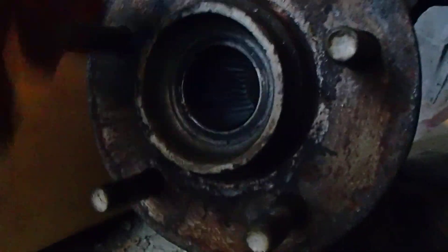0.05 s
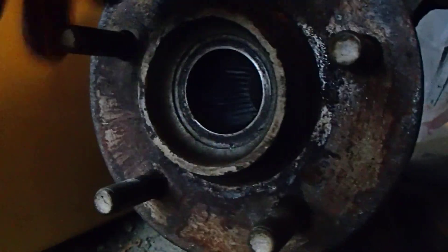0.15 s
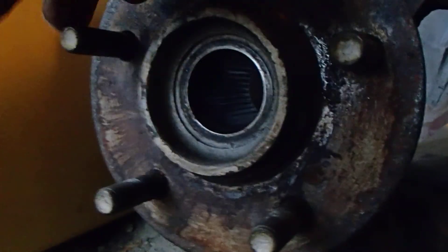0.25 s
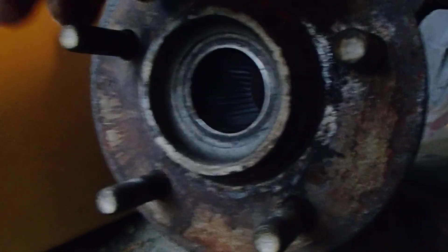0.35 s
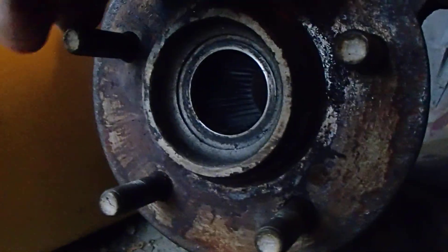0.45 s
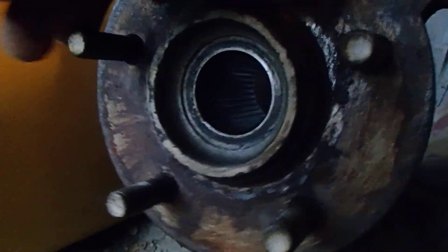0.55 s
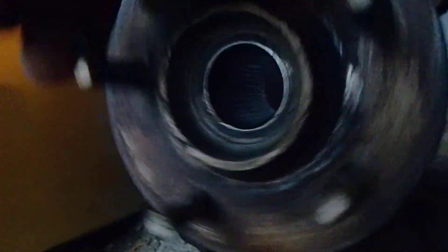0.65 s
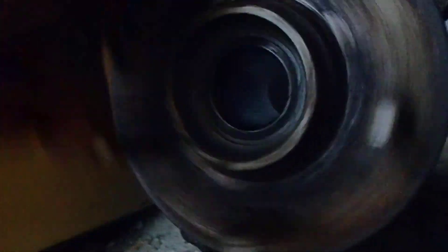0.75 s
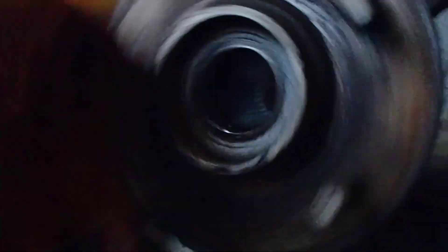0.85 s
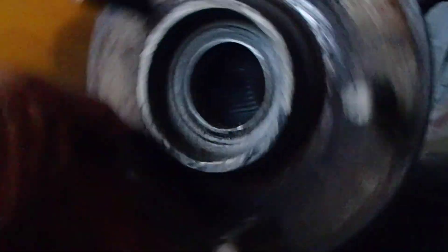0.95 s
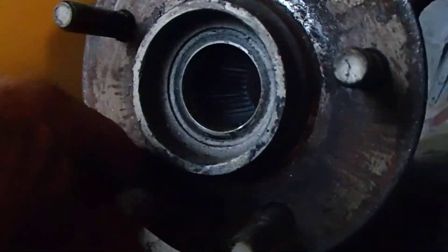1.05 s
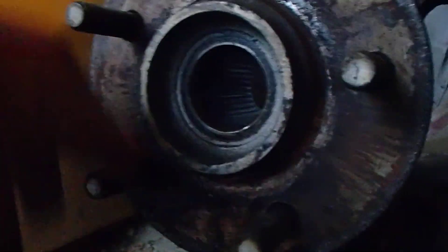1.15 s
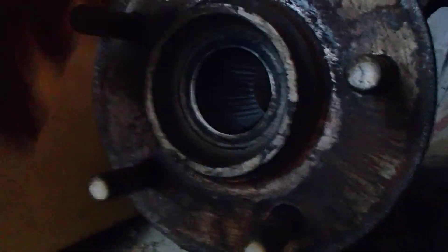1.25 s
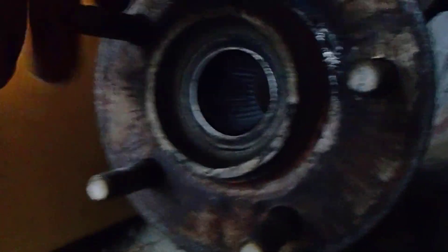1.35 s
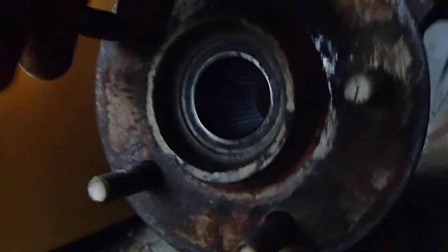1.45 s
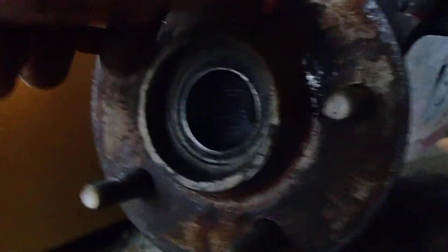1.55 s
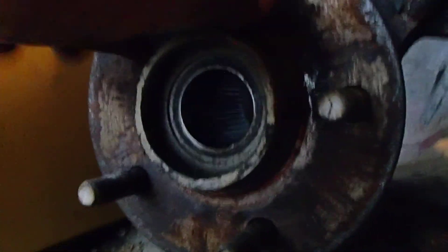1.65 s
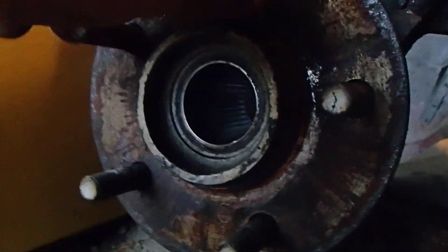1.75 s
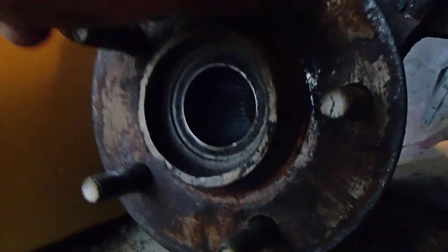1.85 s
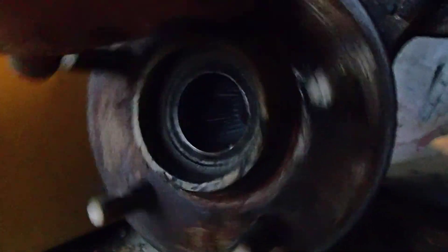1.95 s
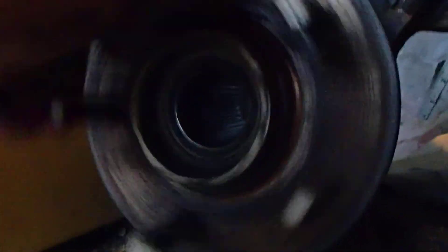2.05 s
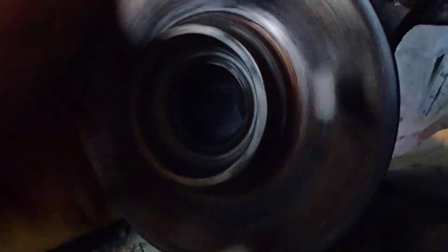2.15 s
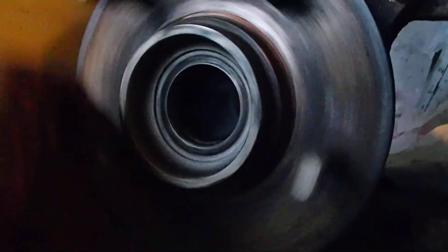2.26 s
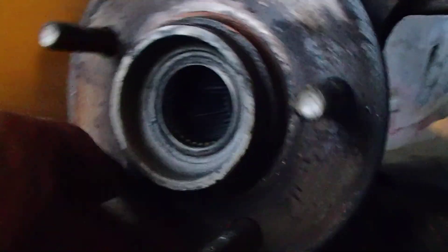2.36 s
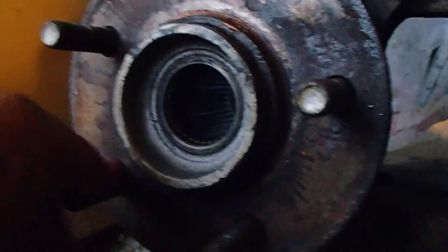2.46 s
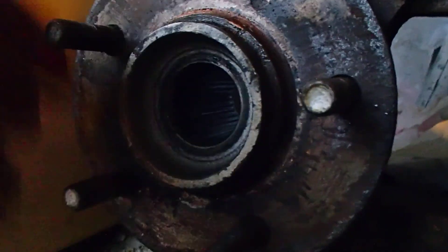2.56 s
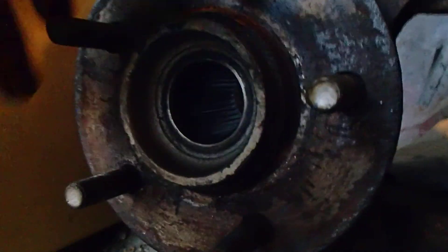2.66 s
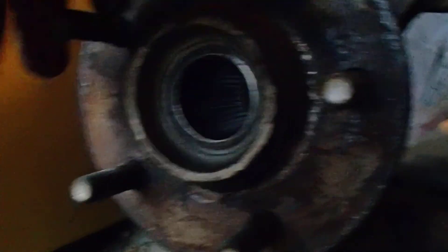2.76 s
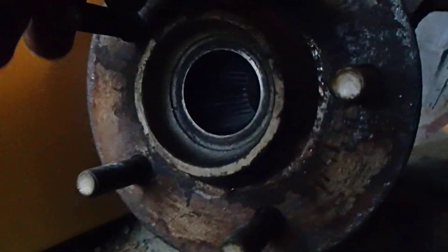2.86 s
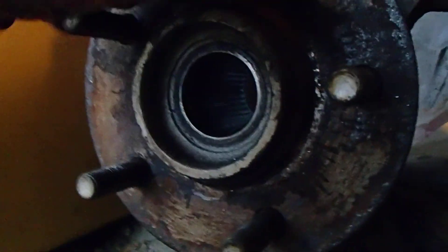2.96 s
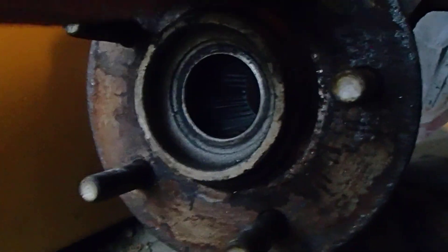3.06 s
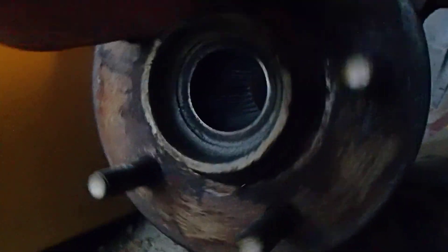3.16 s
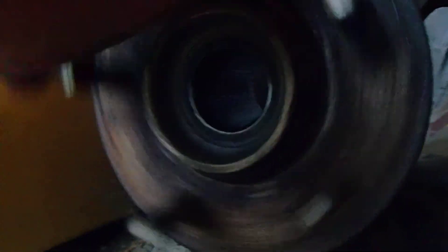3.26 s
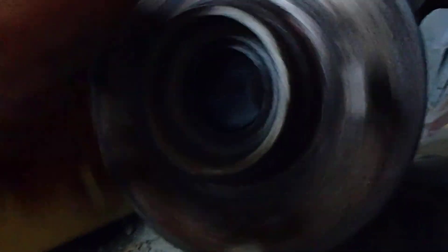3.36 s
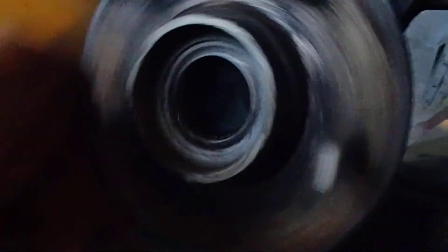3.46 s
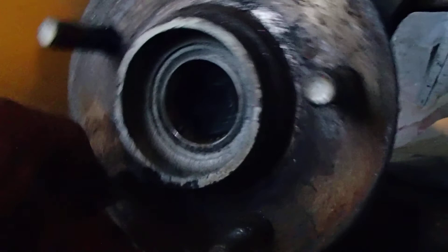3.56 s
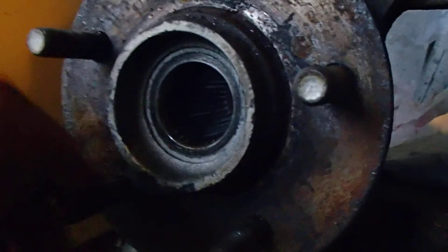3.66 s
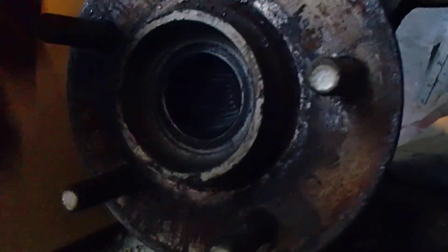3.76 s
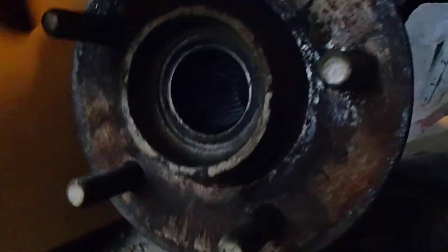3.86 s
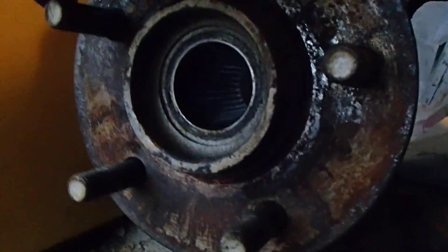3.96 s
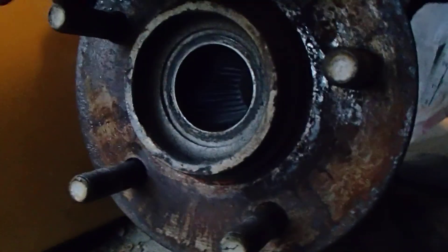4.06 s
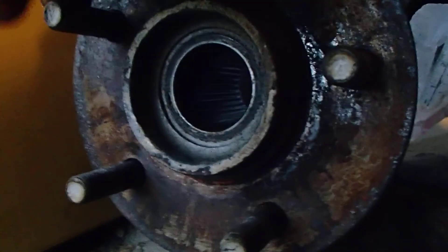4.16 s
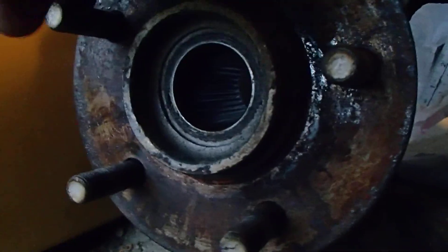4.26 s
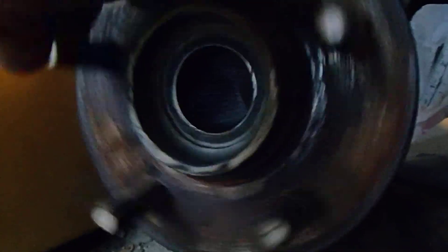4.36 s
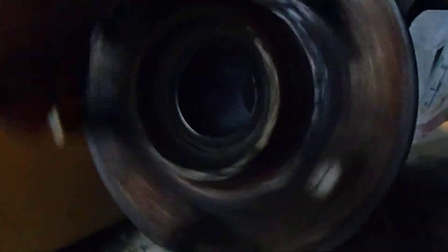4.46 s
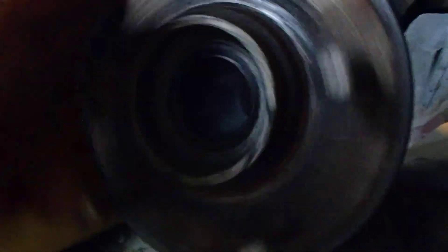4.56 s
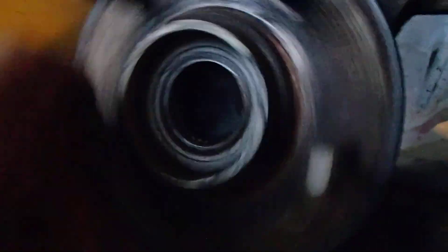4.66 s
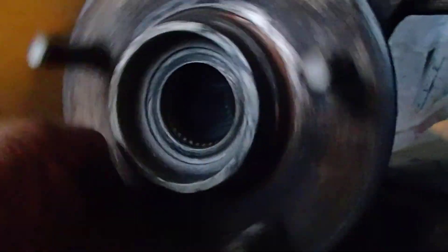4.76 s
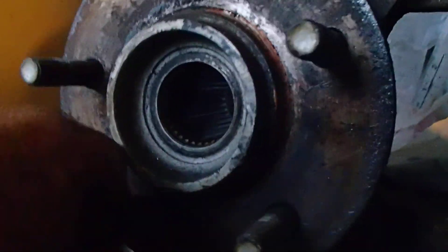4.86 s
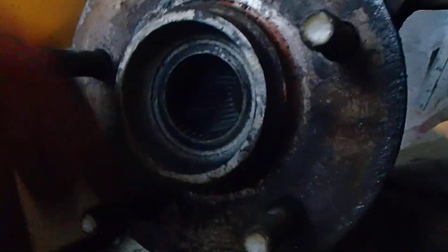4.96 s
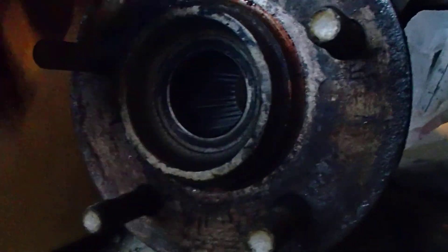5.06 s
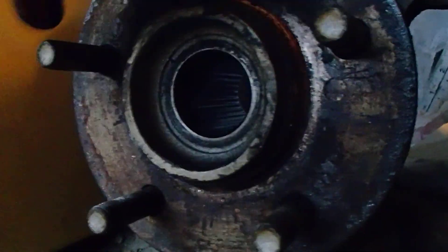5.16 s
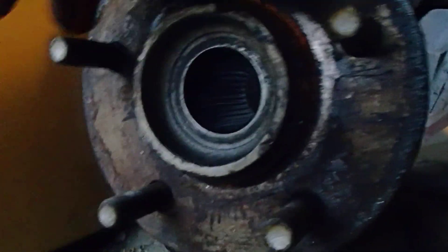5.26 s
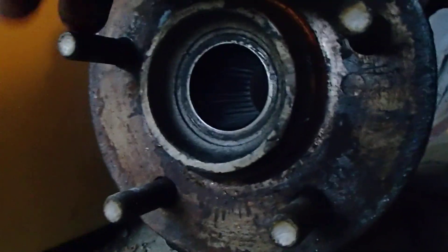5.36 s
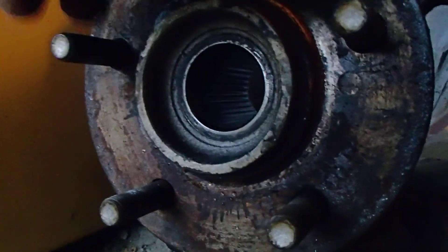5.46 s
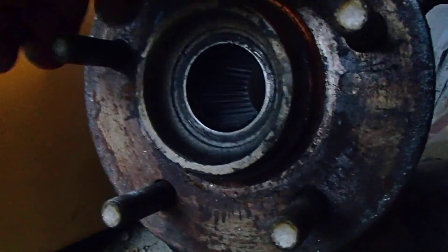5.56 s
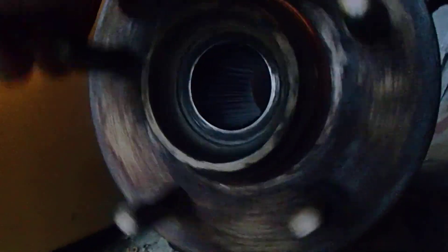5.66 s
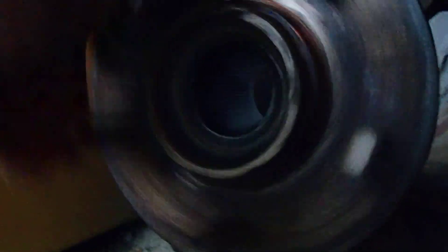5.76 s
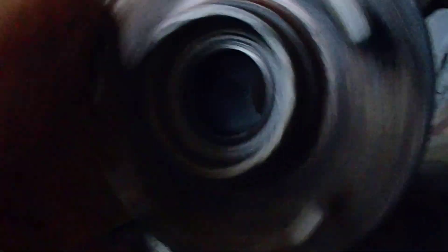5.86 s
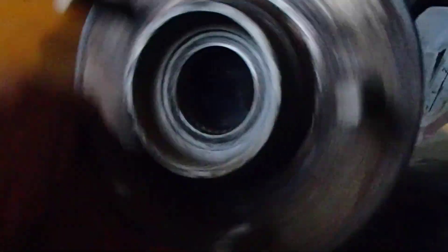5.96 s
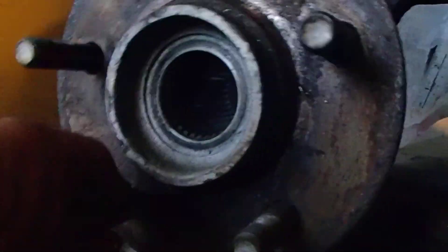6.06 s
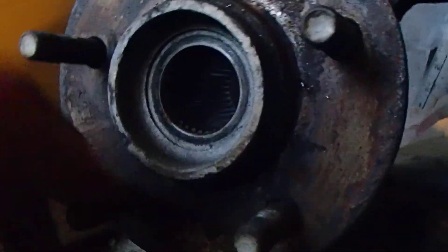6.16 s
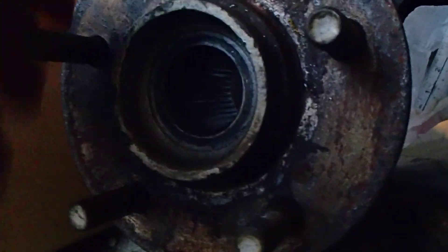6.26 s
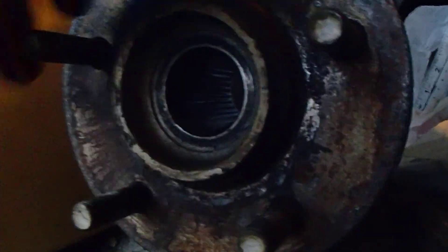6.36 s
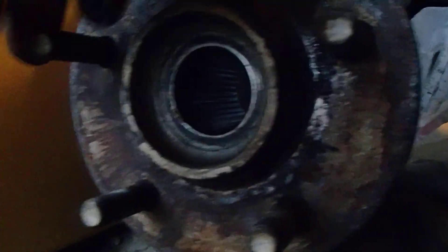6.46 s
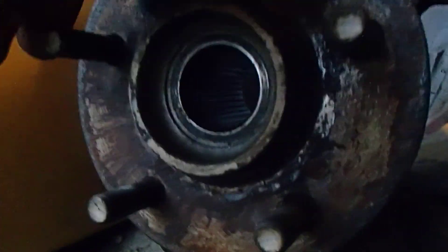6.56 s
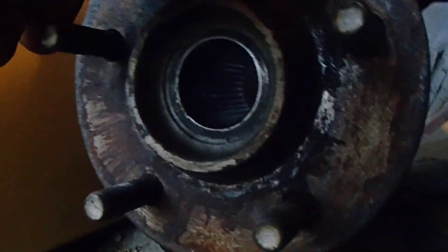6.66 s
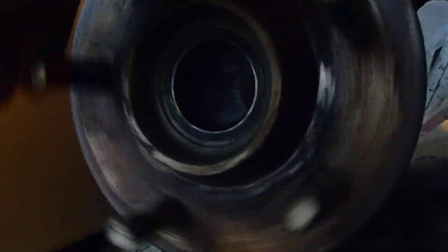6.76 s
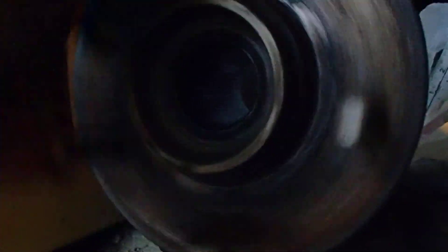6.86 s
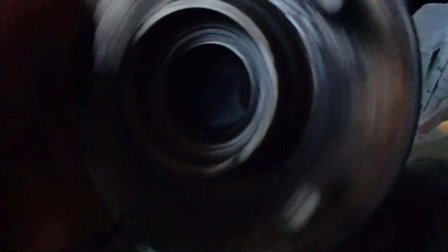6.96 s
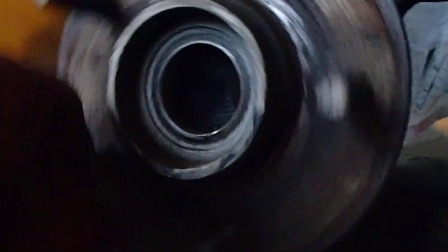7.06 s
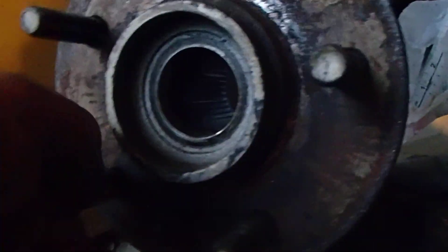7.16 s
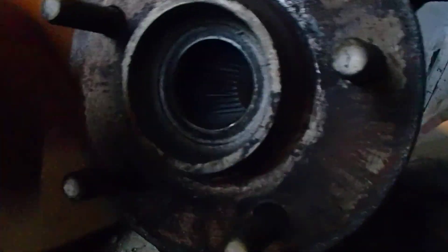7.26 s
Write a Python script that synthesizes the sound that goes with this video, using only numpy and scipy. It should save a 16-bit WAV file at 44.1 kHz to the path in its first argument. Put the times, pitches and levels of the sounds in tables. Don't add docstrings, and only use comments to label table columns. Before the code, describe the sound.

In a quiet indoor workshop, steady hiss and a dull finger tap precede a bright, crackling snap from a dry bearing. A second crunch follows about a fifth of a second later as the turn ends. The pattern repeats unevenly six times, with light finger touches, small ticks and short high rings in the pauses. Close, single-channel sound with a very short room tail.

```python
import sys
import numpy as np
from scipy import signal
from scipy.fft import rfft, irfft, next_fast_len
from scipy.io import wavfile
from scipy.ndimage import uniform_filter1d

SR = 44100
rng = np.random.default_rng(int(sys.argv[2]) if len(sys.argv) > 2 else 0)


def volts(x):
    e = np.asarray(x, float) / 20
    return 10 ** e


def master(y):
    cut = np.clip(np.atleast_2d(y).T, -1, 1)
    pcm = np.round(cut * 32767)
    wavfile.write(sys.argv[1], SR, pcm.astype(np.int16))


N = 322371

# [f/Hz, density/dB per Hz]
ROOM_COLOUR = [(20, -7), (50, -10.5), (200, -8.5), (330, -3.5), (470, -8), (570, -1.5), (950, 1.5),
               (1650, -2), (2100, -2.5), (4200, -5), (4550, -10.5), (7000, -19), (14500, -30), (16000, -33)]
# [f/Hz, width/Hz, level/dB]
MURMURS = [(4136, 17, -62.5), (6700, 30, -82)]
ROOM_DB = -45.5

FLANGE_HZ = [3316, 4160, 5540, 6600, 8205, 10145, 4740, 5470]
# [time to fall 60 dB/s, split/Hz, share of the twin]
FLANGE_PAIRS = [(0.19, 2.1, 0.19), (0.34, 11.7, 0.28), (0.3, 15, 0.16), (0.17, 60.0, 0.31),
                (0.25, 10.3, 0.19), (0.15, 16, .2), (0.12, 21.0, .3), (0.16, 88, 0.34)]
# [t/s, f/Hz, level/dB, free time/s]
GRAZES = [(0.089, 4160, -45, .05), (.09, 6600, -55, .05), (.13, 3316, -44, .05), (.13, 4160, -47, .05),
          (.29, 5540, -54, .05), (.718, 5540, -40, .03), (.81, 5540, -53, .04), (1.065, 5540, -51, .05),
          (1.58, 3316, -45, .04), (2.98, 6600, -56, .035), (3.74, 3316, -38, 0.067),
          (4.7, 4160, -46, 0.065), (4.835, 3316, -40, 0.057), (4.87, 3316, -41, .04),
          (5.03, 4160, -49, .07), (5.19, 5540, -51.5, .09), (5.91, 4160, -45, .07), (6.1, 3316, -44.5, .07),
          (6.115, 4160, -47, .07), (6.17, 4160, -47, 0.073)]
# [t/s, level of modes 1, 2, 3, 4/dB]
TOUCHES = [(.396, -42.5, -51, -53, -46), (.8, -72, -47, -74, -43), (.826, -35.5, -71, -47, -56),
           (1.15, -48, -36, -44.5, -43), (1.265, -72, -55, -72, -49), (1.51, -43.5, -40.5, -53, -51),
           (1.535, -38.5, -42, -48, -42.5), (3.675, -30.5, -23.5, -48, -46), (4.895, -41, -33.5, -51, -44),
           (4.925, -40, -59, -42, -56), (4.97, -50, -61, -62, -72), (5.465, -72, -46, -72, -48),
           (6.064, -60, -42, -49, -55), (7.135, -45, -72, -46.5, -58)]
# [t/s, level of modes 1, 4, 5/dB, free time before the bearing grips/s]
RINGS = [(.714, -18.5, -47, -59, 0.067), (.912, -43, -52, -64, 0.032), (2.077, -24.5, -51, -47, .09),
         (2.272, -52, -60, -68, 0.033), (3.287, -35, -49, -53, 0.071), (3.46, -23, -44, -61, 0.017),
         (4.464, -19, -40, -53, 0.084), (4.657, -29, -57, -57, 0.023), (5.737, -27.5, -51, -54, 0.037),
         (5.902, -32, -52, -49, .045), (6.827, -35, -32, -43, 0.053), (7.004, -26, -38, -50, 0.027)]
GRIP_T60_S = 0.07
CRUNCH_RISE_S, TOUCH_RISE_S = 0.0015, 0.0066
OVERTONE_DB, SIDE_TONE_DB = -0.5, -16
RIM_BASE_DB, RIM_FOLLOWS = -32, 0.36
TOUCH_FREE_S, TOUCH_FREE_S_PER_DB, TOUCH_FIRM_DB = 0.048, 0.3, -41
ASLEEP_DB = -75

# [t/s, peak level/dB, length/s]
TAPS = [
    (0.253, -36, 0.0057),
    (1.682, -26, 0.01),
]
# [f/Hz, width/Hz, level/dB]
TAP_COLOUR = [(810, 490, 4.5), (1950, 260, 5), (2940, 1100, 3), (4770, 2800, -2.5)]
# [t/s, peak level/dB, length/s]
BRUSHES = [(.39, -69, .03), (0.712, -51, .008), (.83, -61, 0.028), (1.54, -66, .02), (2.06, -77, .03),
           (2.24, -59, 0.019), (2.38, -69, .02), (3.283, -59, .006), (3.42, -58, 0.014),
           (3.564, -63, 0.018), (4.636, -44, .008), (4.829, -65, 0.019), (4.908, -58, .01),
           (5.47, -68, .02), (5.74, -73, 0.018), (5.893, -51, .008), (6.07, -64, 0.016),
           (6.819, -54, 0.0059), (6.979, -63, 0.027), (7.069, -64, 0.032), (7.14, -67, 0.026)]
BRUSH_REST_DB = -64.5
# [t/s, peak level/dB]
TICKS = [
    (1.922, -47),
    (3.5472, -47),
    (3.675, -42),
    (4.806, -43),
    (5.4627, -39.5),
]
# [t/s, peak level/dB]
KNOCKS = [(.75, -44), (2.25, -43.5), (5.72, -40.5), (5.873, -35), (6.85, -41), (3.325, -35), (3.364, -39),
          (4.551, -40), (5.844, -43)]

# [t/s, length/s, rumble level at full speed/dB]
TURNS = [
    (0.613, 0.42, -42.5),
    (2.001, 0.33, -50),
    (3.197, 0.28, -42.5),
    (4.4, 0.31, -41.5),
    (5.64, 0.37, -42.5),
    (6.778, .25, -44),
]
RUMBLE_REST_DB = -52

# [t/s, length/s, race level/dB, chatter f/Hz, cage level against race/dB]
CRUNCHES = [(0.699, .015, -13, 3640, -9), (.861, .001, -40, 3440, 2), (0.8827, .028, -24.5, 3590, -6.5),
            (2.0607, .018, -19.5, 3560, 1), (2.2217, 0.0075, -36, 3420, -7),
            (2.2403, .031, -23.5, 3620, -2), (3.2722, .006, -24, 3520, 0), (3.2835, 0.0016, -9, 3530, -23),
            (3.414, 0.007, -32.5, 3700, -10), (3.4294, .028, -20, 3480, -4.5),
            (3.6744, .001, -29, 4170, -25), (4.454, 0.012, -14, 3550, -3), (4.592, .0005, -45, 3720, 11),
            (4.621, 0.0056, -27, 3400, -13), (4.6321, 0.023, -12, 3640, -7),
            (5.727, 0.0083, -13.5, 3520, -7), (5.871, 0.0032, -34, 3375, -3),
            (5.8822, 0.023, -20.5, 3580, -5.5), (6.8068, 0.0123, -16, 3500, -2),
            (6.8236, .004, -10.5, 3520, -8), (6.933, 0.0038, -48, 3496, -1), (6.9725, .003, -34, 3500, -16),
            (6.9846, .016, -19.5, 3330, -6)]
# [t/s, race level/dB, chatter f/Hz, cage level/dB]
CATCHES = [(.6954, -15, 3410, -9.5), (.7053, -10, 3190, -12), (.713, -9, 3430, -10.5),
           (.8908, -27, 3610, -31), (.907, -22, 3520, -25), (2.063, -4, 3590, -5), (2.0717, -14, 3456, -24),
           (2.0767, -14, 3600, -26), (2.2572, -16.5, 3696, -32), (3.274, -13, 3490, -14),
           (3.2767, -11, 3600, -11), (3.2825, -8, 3606, -10), (3.4299, -13.5, 3820, -20),
           (3.4377, -17, 3590, -29), (3.4533, -10.5, 3520, -28), (3.4608, -15.5, 3500, -23),
           (4.4582, -27, 3600, -25), (4.4649, -18, 3580, -14.5), (4.6359, -14, 3610, -8),
           (4.6444, -16, 3530, -27), (4.653, -14, 3520, -20), (5.727, -17, 3355, -11.5),
           (5.7322, -6, 3560, -10), (5.7363, -14, 3510, -13), (5.8903, -10, 3583, -10.5),
           (5.8992, -10, 3497, -9.5), (6.811, -23, 3600, -11.5), (6.8168, -13, 3250, -17),
           (6.8218, -5.5, 3348, -8), (7.0053, -13.5, 3310, -15.5)]
# [f/Hz, width/Hz, level/dB]
RACE = [(2057, 117, -15.5), (2408, 114, -9.5), (3056, 296, -2.5), (3890, 230, 4.5), (3918, 275, 1)]
# [f/Hz, width/Hz, level/dB]
CAGE = [(5115, 200, -6), (5440, 260, 2), (6010, 220, -7), (6197, 183, 8.5), (6616, 280, -3.5),
        (7050, 114, -2), (7860, 250, -10.5)]
# [f/Hz, width/Hz, level/dB]
GRIT = [(9120, 210, 7), (10300, 230, 6), (12200, 300, -2), (12400, 900, -20), (14500, 1700, -13)]
# [f/Hz, width/Hz, level/dB]
SQUEAL = [(3500, 330, 0)]
SLIP_GAP_S, SLIP_UNEVEN = 0.003, 0.3
SLIP_SPREAD_DB, SLIP_SPREAD_HZ = 2, 110
CRUNCH_RELEASE_DB_PER_S = 2500
CAGE_FADE_DB_PER_S = 252
CAGE_SPREAD_DB = 2.5
GRIT_BASE_DB, GRIT_FOLLOWS, GRIT_SPREAD_DB = -27.5, 0.8, 3

WALLS_DB, WALLS_T60_S = -21.5, 0.14
MICROPHONE_TOP = 1.4


def resonate(x, peaks):
    out = 0
    for k, (hz, width_hz, db) in enumerate(peaks):
        r = np.exp(-np.pi * width_hz / SR)
        b = (1 - r * r) / 2 * np.array([1, 0, -1])
        a = [1, -2 * r * np.cos(2 * np.pi * hz / SR), r * r]
        out = out + (-1) ** k * volts(db) * signal.lfilter(b, a, x + 1e-18)
    return out * np.std(x) / np.std(out)


def grains(per_s, spread_db):
    sizes = volts(spread_db * np.minimum(rng.exponential(1, N), 3.0)) * rng.choice([-1, 1], N)
    hits = sizes * (rng.random(N) < per_s / SR)
    return hits / np.std(hits)


def swells(times, levels_db, rise_s, fall_s):
    power = np.zeros(N)
    np.add.at(power, (np.array(times) * SR).astype(int), volts(2 * np.array(levels_db)))
    t = np.arange(-2000, 2001) / SR
    shape = np.where(t < 0, np.exp(-(t / rise_s) ** 2), np.exp(-np.abs(t) / fall_s))
    return np.sqrt(np.abs(signal.fftconvolve(power, shape, "same")))


def room():
    size = next_fast_len(N)
    hz, db = np.transpose(ROOM_COLOUR)
    bins_hz = np.fft.rfftfreq(size, 1 / SR)
    colour = volts(np.interp(np.log(bins_hz + 1), np.log(hz), db))
    hiss = irfft(rfft(rng.standard_normal(size)) * colour, size)[:N]
    murmur = sum(volts(db) * resonate(rng.standard_normal(N), [(hz, width_hz, 0)])
                 for hz, width_hz, db in MURMURS)
    return volts(ROOM_DB) * hiss / np.std(hiss) + murmur


def hand_rows():
    touches = []
    for s, *db in TOUCHES:
        firmness_db = max(max(db) - TOUCH_FIRM_DB, 0)
        touches.append((s, *db, TOUCH_FREE_S + TOUCH_FREE_S_PER_DB * firmness_db))
    struck_hz = np.array(FLANGE_HZ[:4])
    grazes = []
    for s, hz, db, free_s in GRAZES:
        distance = np.abs(struck_hz - hz)
        levels_db = np.where(distance == distance.min(), db, ASLEEP_DB)
        grazes.append((s, *levels_db, free_s))
    return touches + grazes


def flange(rows, struck, follower, rise_s):
    out = np.zeros(N + SR)
    t = np.arange(SR // 3) / SR
    leader, follower_mode, under_db = follower
    modes = np.column_stack([FLANGE_HZ, FLANGE_PAIRS])[struck + [follower_mode]]
    hz, t60, split_hz, share = modes.T[:, :, None]
    phases = 2 * np.pi * rng.random((len(rows), len(hz), 1))
    for (s, *levels_db, free_s), phase in zip(rows, phases):
        levels_db = np.append(levels_db, levels_db[leader] + under_db)[:, None]
        main = np.sin(2 * np.pi * hz * t + phase)
        twin = np.sin(2 * np.pi * (hz + split_hz) * t + phase)
        pair = (main + share * twin) / (1 + share)
        loss_db = 60 * t / t60 + 60 * np.maximum(t - free_s, 0) / GRIP_T60_S
        tones = volts(levels_db - loss_db) * pair
        out[int(s * SR):][:len(t)] += np.clip(t / rise_s, 0, 1) * tones.sum(axis=0)
    return out[:N]


def fingers():
    taps = resonate(grains(per_s=2300, spread_db=-14.0), TAP_COLOUR)
    taps = signal.sosfilt(signal.butter(2, 6000, fs=SR, output="sos"), taps)
    tap_force = sum(swells([s], [db - 9.0], 0.0048, length) for s, db, length in TAPS)
    brush = resonate(grains(per_s=7300, spread_db=2.0), [(11900, 6000, 2.0), (15100, 910, 3)])
    strokes = sum(swells([s], [db], length, length) for s, db, length in BRUSHES)
    skin = (volts(BRUSH_REST_DB) + strokes) * brush
    nail = resonate(rng.standard_normal(N), [(4500, 3000, 9), (12000, 7000, -12)])
    ticks = nail * swells(*np.transpose(TICKS), 0.0004, 0.0006)
    housing = resonate(grains(per_s=1600, spread_db=2.5), [(795, 240, -0.26), (1170, 270, -1.7)])
    knocks = housing * swells(*np.transpose(KNOCKS), 0.0031, 0.0058)
    return taps * tap_force + volts(-0.5) * (ticks + knocks) + volts(-1.5) * skin


def rumble():
    housing = [(134, 64, 2.0), (844, 170, 2), (1290, 210, 4.0), (2110, 225, 6.5)]
    t = np.arange(N) / SR
    speed = sum(volts(db) * np.sin(np.pi * np.clip((t - s) / length, 0, 1)) ** 2
                for s, length, db in TURNS)
    grinding = resonate(grains(per_s=1200, spread_db=3.0), housing)
    return volts(-4.5) * np.hypot(volts(RUMBLE_REST_DB), speed) * grinding


def slips():
    start, length, race_db, pitch_hz, cage_db = np.transpose(CRUNCHES)[:, :, None]
    luck = rng.standard_normal((len(CRUNCHES), 14, 4))
    gaps = SLIP_GAP_S * np.exp(SLIP_UNEVEN * luck[..., 0])
    since = np.cumsum(gaps, axis=1) - gaps[:, :1]
    late_db = CRUNCH_RELEASE_DB_PER_S * np.maximum(since - length, 0)
    race_db = race_db - late_db + SLIP_SPREAD_DB * luck[..., 1]
    pitch_hz = pitch_hz + SLIP_SPREAD_HZ * luck[..., 2]
    cage_db = race_db + cage_db - CAGE_FADE_DB_PER_S * since + CAGE_SPREAD_DB * luck[..., 3]
    runs = np.stack([start + since, race_db, pitch_hz, cage_db], axis=2).reshape(-1, 4)
    rows = np.vstack([CATCHES, runs])
    grit_luck_db = GRIT_SPREAD_DB * rng.standard_normal(len(rows))
    grit_db = GRIT_BASE_DB + GRIT_FOLLOWS * rows[:, 3] + grit_luck_db
    heard = np.append(np.zeros(len(CATCHES)), late_db) < 20
    in_time = np.argsort(rows[heard, 0])
    return np.column_stack([rows, grit_db])[heard][in_time].T


def buzz(peaks):
    rough = resonate(grains(per_s=6500, spread_db=5.0), peaks)
    return rough / (np.sqrt(uniform_filter1d(rough ** 2, size=60)) + 0.084)


def chatter():
    s, race_db, pitch_hz, cage_db, grit_db = slips()
    wobble_hz = 45 * uniform_filter1d(rng.standard_normal(N), size=49) * 7
    squeal_hz = np.interp(np.arange(N) / SR, s, pitch_hz) + wobble_hz
    force = swells(s, race_db - 2.0, 0.0011, 0.001)
    squeal = np.sin(2 * np.pi * np.cumsum(squeal_hz) / SR) * force
    race = 0.55 * squeal + 0.5 * resonate(squeal, SQUEAL)
    race = race + volts(-7.0) * buzz(RACE) * force
    cage = buzz(CAGE) * swells(s, cage_db - 3.0, 0.00095, 0.0012)
    cage = 0.98 * cage + 0.59 * resonate(cage, CAGE)
    crack = np.zeros(N)
    crack[(s * SR).astype(int)] = volts(cage_db - 2.0) * rng.choice([-1, 1], size=400)[:len(s)]
    crack = resonate(crack, [(2850, 860, 2), (3700, 640, -7.0), (5000, 300, 8), (6200, 410, -12)])
    body = signal.sosfilt(signal.butter(4, 8500, fs=SR, output="sos"), race + cage + crack)
    return body + buzz(GRIT) * swells(s, grit_db - 3.5, 0.0021, 0.00093)


def walls(x):
    t = np.arange(SR // 4) / SR
    tail = rng.standard_normal(len(t)) * volts(-60 * t / WALLS_T60_S) * (t > 0.003)
    return volts(WALLS_DB) * signal.fftconvolve(x, tail / np.sqrt(np.sum(tail ** 2)))[:N]


def scene():
    crunch = chatter()
    rings = [(s, low_db, RIM_BASE_DB + RIM_FOLLOWS * low_db, *rest) for s, low_db, *rest in RINGS]
    after_crunch = flange(rings, [0, 7, 3, 4], (3, 5, OVERTONE_DB), CRUNCH_RISE_S)
    after_touch = flange(hand_rows(), [0, 1, 2, 3], (1, 6, SIDE_TONE_DB), TOUCH_RISE_S)
    bearing = crunch + walls(crunch)
    return (bearing + after_crunch + after_touch + fingers() + rumble() + room())[None]


def top_cut(x):
    return signal.sosfilt(signal.butter(12, 16810, fs=SR, output="sos"), x)


def record(dry):
    rounded = MICROPHONE_TOP * np.tanh(dry / MICROPHONE_TOP)
    cut = signal.ellip(8, 0.5, 40, 15600, fs=SR, output="sos")
    mix = signal.sosfilt(cut, rounded)
    return top_cut(mix)


dry = scene()
out = record(dry)
master(out)
```